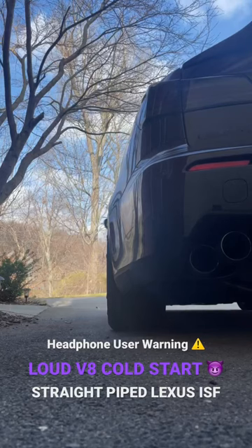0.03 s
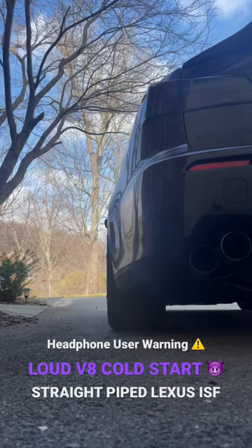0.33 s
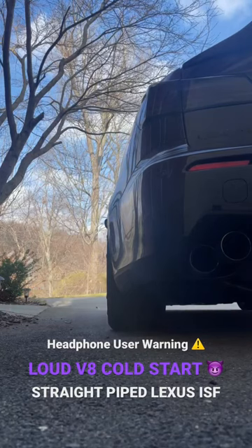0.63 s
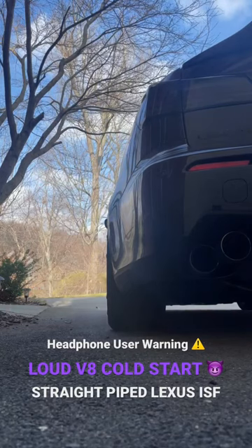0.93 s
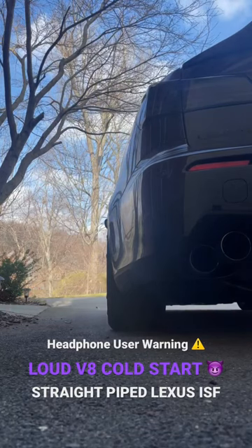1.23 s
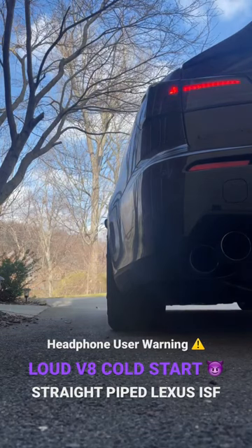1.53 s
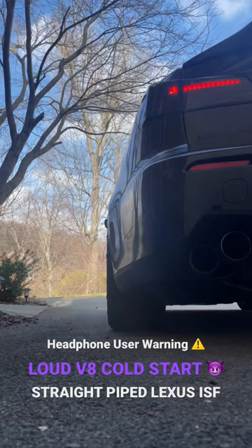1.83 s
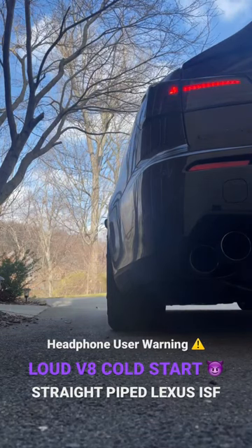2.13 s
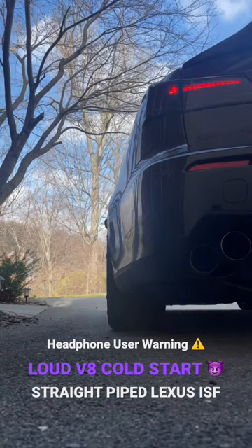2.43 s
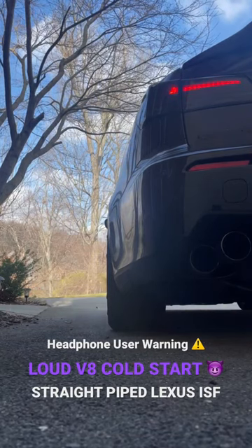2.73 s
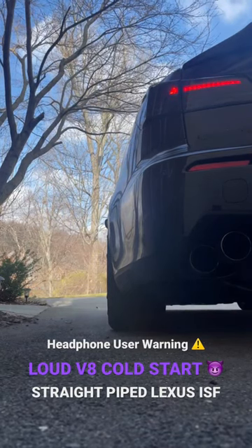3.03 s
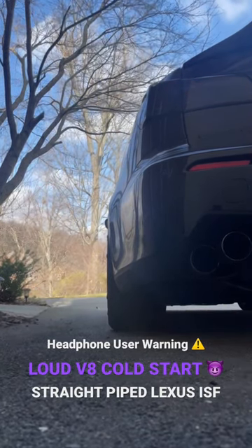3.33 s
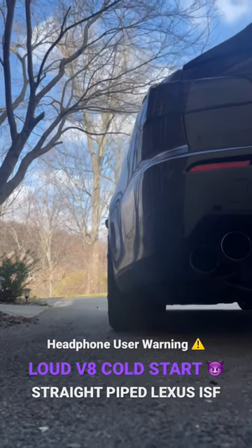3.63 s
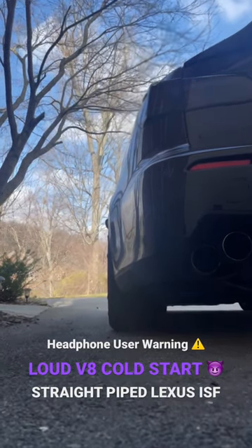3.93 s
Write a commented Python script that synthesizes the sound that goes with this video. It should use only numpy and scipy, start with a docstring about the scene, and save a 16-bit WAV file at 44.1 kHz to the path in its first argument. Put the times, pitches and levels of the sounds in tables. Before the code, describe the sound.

A V8 car engine starts cold outdoors, heard close behind the exhaust. A brief rushing thump opens over quiet low rumble, with a faint bird chirp at 0.5 seconds and a faint pump whirr from 1.7. At 2.3 seconds the starter clacks in and grinds with low puffs. Around 2.9 the engine catches with several bangs, settling into a loud, lumpy, raspy fast idle through 4 seconds.

```python
"""A driveway, close behind the open pipes of a V8 started from cold.
Outdoor rumble, a brief rushing thump, a bird, a faint pump-like whirr. The starter pinion clacks in and
its gears grind, sagging at each compression, while the pipes puff. The engine catches with a few bangs,
sags, and settles into a loud, lumpy fast idle: each firing rings the pipes and lets out a rasp of gas."""
import sys
import numpy as np
from scipy import signal
from scipy.fft import rfft, irfft
from scipy.io import wavfile
from scipy.ndimage import uniform_filter1d, map_coordinates

SR = 44100
rng = np.random.default_rng(int(sys.argv[2]) if len(sys.argv) > 2 else 0)


def log_audio(samples):
    """Write samples as a 16-bit WAV file to the path given in sys.argv[1]."""
    # one column per channel
    frames = np.atleast_2d(samples).T
    # limit to full scale, then quantise
    limited = np.clip(frames, -1, 1)
    pcm = np.round(limited * 32767).astype(np.int16)
    wavfile.write(sys.argv[1], SR, pcm)


N = 176400


def amp(db):
    return 10 ** (np.asarray(db) / 20)


def clock():
    return np.arange(N) / SR


def curve(table, column=1):
    """Table column, linear in time."""
    rows = np.array(table)
    return np.interp(clock(), rows[:, 0], rows[:, column])


def unit_rms(x):
    return x / np.sqrt(np.mean(x ** 2))


def conv(x, response):
    return signal.fftconvolve(x, response)[:N]


def colour(x, points, size=8192):
    """Minimum-phase filter through (f/Hz, gain/dB) points; 12 dB/octave roll-off below them."""
    hz, db = np.array(points, float).T
    f = np.maximum(np.fft.rfftfreq(size, 1 / SR), 1)
    bass_cut = np.minimum(f / hz.min(), 1) ** 2
    gain = amp(np.interp(np.log(f), np.log(np.sort(hz)), db)) * bass_cut
    cepstrum = irfft(np.log(gain))
    cepstrum[1:size // 2] *= 2
    cepstrum[size // 2 + 1:] = 0
    return conv(x, irfft(np.exp(rfft(cepstrum))))


def noise():
    return rng.standard_normal(N)


def wander(rate_hz):
    """Smooth random drift, unit RMS."""
    hold = int(SR / rate_hz)
    steps = np.repeat(rng.standard_normal(N // hold + 1), hold)
    return unit_rms(uniform_filter1d(uniform_filter1d(steps, hold), hold)[:N])


def clicks(times_s, sizes, half_width=8):
    """Band-limited impulses."""
    out = np.zeros(N)
    for at, size in zip(np.asarray(times_s) * SR, sizes):
        i = int(at) + np.arange(-half_width, half_width + 1)
        if i[0] >= 0 and i[-1] < N:
            out[i] += size * np.sinc(i - at) * np.hanning(len(i))
    return out


def fade(decay_s):
    return np.exp(-clock()[:SR // 2] / decay_s)


def stereo(mid, side):
    return np.array([mid + side, mid - side])


def echoes(x, decay_s):
    """Dense reflections, one unit-energy tail per channel."""
    tails = [fade(decay_s) * rng.standard_normal(SR // 2) for _ in range(2)]
    return np.array([conv(x, tail / np.linalg.norm(tail)) for tail in tails])


def low_rings(table, rise_s=0.002, overtone_ratio=1.8, overtone_db=-12.5):
    """Soft pushes ring a low resonance and its overtone."""
    out = np.zeros(N)
    for start_s, db, hz, decay_s in table:
        age_s = np.maximum(clock() - start_s, 0)
        phase = 2 * np.pi * hz * age_s
        ring = np.sin(phase) + amp(overtone_db) * np.sin(overtone_ratio * phase)
        out += amp(db) * ring * (1 - np.exp(-age_s / rise_s)) * np.exp(-age_s / decay_s)
    return out


# side re mid: f/Hz, gain/dB
DIFFUSE_SIDE = [(60, -50.5), (350, -12), (620, -2), (10000, 0)]


def diffuse(points):
    """Coloured noise, centred in the bass, wide in the treble."""
    mid = colour(noise(), points)
    side = colour(colour(noise(), points), DIFFUSE_SIDE)
    return stereo(mid, side) / mid.std()


# ground and bodywork reflections: delay/ms
REFLECTION_DELAYS_MS = [8.1, 2.6, 6]
# same reflections, yard tail: f/Hz, gain/dB
REFLECTION_EQ = [(60, -25), (200, -19), (620, -7.5), (1100, -7), (10000, -1.5)]
YARD_EQ = [(100, -22), (400, -6.5), (700, 2.5), (1300, -5), (3000, 2), (10000, -3)]


def outdoors(x, yard_decay_s=0.022):
    """Direct sound, side reflections off ground and car, short tail from the yard."""
    t = clock()
    taps = [(-1) ** k * np.interp(t - ms / 1000, t, x, left=0)
            for k, ms in enumerate(REFLECTION_DELAYS_MS)]
    side = colour(sum(taps), REFLECTION_EQ) / np.sqrt(len(taps))
    return stereo(x, side) + echoes(colour(x, YARD_EQ), yard_decay_s)


# outdoor rumble: f/Hz, gain/dB
AIR_EQ = [(28, -9.5), (81, 0.5), (169, -9.5), (400, -17.5), (651, -22.5), (840, -18.5), (1330, -26.5),
          (2580, -47), (11000, -84)]
# bumps: t/s, level/dB, f/Hz, decay/s
BUMP_RINGS = [(.67, -29, 78.4, 0.061), (.745, -22.5, 104, 0.017), (.77, -27.5, 59.7, 0.048),
              (.862, -27, 84, 0.019), (1.725, -29, 70, 0.024), (2.017, -20, 110, 0.013)]


def background(air_db=-42):
    """Wavering outdoor rumble, a few soft bumps."""
    return diffuse(AIR_EQ) * amp(air_db + wander(15.1)) + low_rings(BUMP_RINGS)


# notes: t/s, length/s, start f/Hz, end f/Hz, level/dB
BIRD_NOTES = [(0.498, 0.14, 2500, 3330, -59.5), (0.506, 0.13, 3400, 4100, -60),
              (0.613, 0.055, 3250, 4210, -53), (0.647, 0.046, 2350, 2890, -54)]


def bird(rasp_depth=.018, husk_db=-8, trees_db=-6, trees_decay_s=.13):
    """Thin, raspy notes swell as they rise; blurred echo from the trees."""
    notes = np.zeros(N)
    for start_s, length_s, from_hz, to_hz, db in BIRD_NOTES:
        progress = np.clip((clock() - start_s) / length_s, 0, 1)
        glide_hz = from_hz + (to_hz - from_hz) * np.sin(np.pi * progress / 2)
        hz = glide_hz * (1 + rasp_depth * wander(700))
        swell = np.sin(np.pi * progress ** 1.5)
        notes += amp(db) * swell * np.sin(2 * np.pi * np.cumsum(hz) / SR)
    blurred = notes * wander(1400)
    return notes + amp(husk_db) * blurred + amp(trees_db) * echoes(blurred, trees_decay_s)


# envelopes: t/s, thump level/dB, rush level/dB
RUSH_LEVELS = [(.032, -80, -80), (.04, -63, -33), (.058, -16, -30.5), (.072, -27.5, -25),
               (.11, -13.5, -32.5), (.15, -21.5, -47), (.175, -31.5, -51.5), (.25, -33, -55.5),
               (.5, -67, -100)]
# thump, rush: f/Hz, gain/dB
THUMP_EQ = [(25, -13), (70, -2), (130, 1), (200, -10.5), (480, -18.5), (800, -35.5), (2000, -83.5)]
RUSH_EQ = [(100, -1.5), (450, 11), (800, -2), (1500, -11), (4000, -14.5), (6500, -23.5), (11000, -41)]


def rush():
    """Brief rush darkening into a low thump."""
    thump = diffuse(THUMP_EQ) * amp(curve(RUSH_LEVELS, 1))
    return thump + diffuse(RUSH_EQ) * amp(curve(RUSH_LEVELS, 2))


# whirr and hiss envelope, switching ticks: t/s, level/dB
PUMP_LEVEL = [(1.64, -120), (1.67, -76), (1.8, -73), (2.1, -68.5), (2.27, -62), (2.35, -120)]
PUMP_TICKS = [(1.68, -66), (1.724, -64), (1.985, -61)]
# hiss and ticks: f/Hz, gain/dB
PUMP_EQ = [(1000, 10), (2000, 7.5), (4000, -1), (5500, -10.5), (10000, -13)]


def pump(whirr_hz=3820, whirr_db=-15, flutter_db=3.5, tick_decay_s=0.026):
    """Pump and valves tick on; faint hiss and rough whirr, like a fuel pump."""
    times_s, db = np.array(PUMP_TICKS).T
    tick_envelope = conv(clicks(times_s, amp(db)), fade(tick_decay_s))
    whirr = amp(whirr_db) * wander(210) * np.sin(2 * np.pi * whirr_hz * clock())
    running = (diffuse(PUMP_EQ) + whirr) * amp(curve(PUMP_LEVEL) + flutter_db * wander(53))
    return running + diffuse(PUMP_EQ) * tick_envelope


# starter envelope: t/s, level/dB
STARTER_LEVEL = [(2.24, -120), (2.275, -31), (2.293, -8.5), (2.324, -6.5), (2.335, 1), (2.55, -4),
                 (2.89, 0), (2.97, -0.5), (3.1, -63)]
# compression peaks: t/s
COMPRESSION_TIMES_S = [2.499, 2.597, 2.684, 2.771, 2.854]
# starter body: f/Hz, gain/dB
STARTER_EQ = [(150, 5), (400, 1), (850, -1.5), (1400, -4.5), (2400, -11.5), (4000, -13.5), (5500, -13.5),
              (7500, -29.5), (10500, -35.5)]
# gear whines at nominal speed: f/Hz, bandwidth/Hz, level/dB
WHINE_BANDS = [(569, 97, -6), (766, 30, -12), (1017, 27, -10.5), (1740, 33, -12), (2135, 27, -13.5),
               (3047, 64, -16.5)]


def starter():
    """Pinion clacks in and grinds; teeth and whines drop in pitch and swell at each compression."""
    starter_db, rattle_db, grit_db = -34, 1.24, 2.5
    mesh_hz, teeth_db, tooth_spread_db = 507.7, -5.5, 3
    speed_sag, speed_waver = 0.07, .015
    strain_width_s, gear_strain_db, grind_strain_db = 0.017, 6, 3
    clack_s, clack_db, clack_decay_s = 2.329, -22, 0.03
    t = clock()
    strain = sum(np.exp(-.5 * ((t - at) / strain_width_s) ** 2) for at in COMPRESSION_TIMES_S)
    travel = np.cumsum(1 - speed_sag * (strain - .5) + speed_waver * wander(25))
    tooth_count = travel * mesh_hz / SR
    times_s = np.interp(np.arange(int(tooth_count[-1])), tooth_count, t)
    impacts = clicks(times_s, amp(tooth_spread_db * noise()[:len(times_s)]))
    teeth = unit_rms(colour(impacts, STARTER_EQ))
    whines = sum(amp(db) * unit_rms(signal.lfilter(*signal.iirpeak(hz, hz / width_hz, fs=SR), noise()))
                 for hz, width_hz, db in WHINE_BANDS)
    whines = map_coordinates(whines, [travel], mode="mirror")  # pitch follows speed
    gears = outdoors(amp(teeth_db) * teeth + whines) * amp(gear_strain_db * strain)
    grind = diffuse(STARTER_EQ) * amp(grind_strain_db * strain + grit_db * wander(500))
    clack = (t > clack_s) * np.exp(-np.abs(t - clack_s) / clack_decay_s) * diffuse(STARTER_EQ)
    envelope = amp(starter_db + curve(STARTER_LEVEL) + rattle_db * wander(90))
    return (gears + grind) * envelope + amp(clack_db) * clack


# puffs: t/s, level/dB, f/Hz, decay/s
PUFF_RINGS = [(2.335, -20.5, 108.3, 0.04), (2.455, -14, 116, 0.016), (2.478, -5.5, 83, 0.014),
              (2.505, -15, 57.2, 0.075), (2.582, -8.5, 58.6, 0.052), (2.757, -9, 83, 0.021),
              (2.82, -15, 65.4, 0.065), (2.904, -2.5, 90.2, 0.046), (2.93, -5.5, 129.2, .05),
              (2.955, -9, 71.7, 0.058), (3.105, -4, 113.3, 0.028)]


def puffs():
    """Low puffs from the pipes while the engine cranks and catches."""
    return outdoors(low_rings(PUFF_RINGS))


def pipe_smear(x, centre_hz=390, q=1.37):
    """All-pass: the pipes delay tones near the centre, turning each blow into a falling bark."""
    _, poles = signal.iirpeak(centre_hz, q, fs=SR)
    return signal.lfilter(poles[::-1], poles, x)


# pipe response to one firing: f/Hz, gain/dB
PIPE_EQ = [(25, -19), (45, -2.5), (65, -2.5), (105, -3.5), (135, -1), (172, 4.5), (205, -9), (248, -5),
           (305, 3), (345, -6.5), (380, 0.5), (430, -5.5), (500, 3.5), (560, -7), (760, -9.5), (830, -15.5),
           (1050, -12), (1270, -30), (2000, -30), (3000, -48.5), (5000, -71), (11000, -73)]


def pipe_ring(pulses, pitch_ratio=1):
    """Pressure pulses ring the open pipes."""
    return colour(pulses, np.array(PIPE_EQ) * [pitch_ratio, 1])


# hard firings: t/s, blow level/dB, crack level/dB
HARD_FIRINGS = [(2.924, 3.5, -6.5), (2.946, 2, -22), (2.964, 8.5, -29), (2.995, -2, -1), (3.099, 2.5, -18),
                (3.12, 5.5, -1), (3.149, 2.5, -9.5), (3.218, -8, -43), (3.307, 2.5, -7.5), (3.353, 1.5, 4),
                (3.425, -9.5, 9.5), (3.47, 3.5, -8.5), (3.526, -2, -20), (3.601, -3, -17),
                (3.694, -9.5, -9), (3.717, -4.5, -12), (3.83, -7, -14)]
# crack: f/Hz, gain/dB
CRACK_EQ = [(400, -1), (1000, 1), (2800, -8.5), (4000, -13.5), (7000, -15.5), (11000, -27)]


def bangs(blow_gain_db=29.5, crack_gain_db=-9, crack_decay_s=0.0023, pitch_spread=0.12):
    """Rich charges go off hard: a sharp crack, and a blow ringing the pipes at a random pitch."""
    times_s, blow_db, crack_db = np.array(HARD_FIRINGS).T
    ratios = np.exp(pitch_spread * rng.standard_normal(len(times_s)))
    blows = sum(pipe_ring(clicks([at], [amp(db)]), ratio)
                for at, db, ratio in zip(times_s, blow_db, ratios))
    crack_envelope = conv(clicks(times_s, amp(crack_db)), fade(crack_decay_s))
    cracks = colour(noise() * crack_envelope, CRACK_EQ)
    return outdoors(pipe_smear(amp(blow_gain_db) * blows + amp(crack_gain_db) * cracks))


# engine speed: t/s, four-stroke cycle rate/Hz
CYCLE_RATE = [(2.9, 6.2), (3.0, 9.0), (3.1, 10.8), (3.17, 14.3), (3.28, 13.4), (3.35, 14.0), (3.42, 13.85),
              (3.55, 13.41), (3.68, 13.12), (3.85, 12.97), (4.0, 12.94)]
# cylinders in firing order: level/dB, lag/ms
FIRING_ORDER = [(-.3, .1), (-3, .8), (-6, -1.0), (-1.7, .6), (-2.4, 1.1), (.8, -.4), (-.8, .7), (-9, .8)]
# combustion: t/s, boom level/dB, bark level/dB, gas level/dB, firing spread/dB
COMBUSTION = [(2.9, -25, -28, -15, 13), (2.93, -9, 4, 0.5, -2), (2.99, 15, 5, 6.5, 8.5),
              (3.04, -1, -0.5, -14, 1.5), (3.09, 4.5, 2.5, -9.5, 1.5), (3.15, 6, 4.5, 3.5, 2),
              (3.19, 3, -9.5, -24.5, 2), (3.295, -1, -9, -28, 2), (3.315, 2, 2.5, -4, 4.5),
              (3.338, 0, -6.5, -4, 0.5), (3.365, 4.5, 0, -2.5, 1.5), (3.5, 4, 1, -5.5, 1.7),
              (3.65, 3, 1, -4, 1.4), (4.0, 1, 1, -5, 0.4)]
# gas rush: f/Hz, gain/dB
GAS_EQ = [(300, -22), (700, 12.5), (1100, 9.5), (1500, 1), (2800, -2.5), (4000, -17.5), (5500, -19),
          (7500, -38.5), (10500, -37.5)]


def engine():
    """Eight uneven firings a cycle ring the pipes, wavering with the flow; gas rasps out after each."""
    pipe_gain_db, crossover_hz = 29, 212
    cylinder_one_s, waver_ms, waver_hz, jitter_ms_per_db = 3.8305, .11, 22, .14
    gas_gain_db, gas_decay_s, gas_spread_db, gust_db, gas_side_db = -14, 0.0061, 3, 1.5, -3
    t = clock()
    boom_db, bark_db, gas_db, spread_db = (curve(COMBUSTION, column) for column in (1, 2, 3, 4))
    cycles = np.cumsum(curve(CYCLE_RATE)) / SR
    firing_count = (cycles - np.interp(cylinder_one_s, t, cycles)) * len(FIRING_ORDER)
    count_at_catch = int(np.interp(COMBUSTION[0][0], t, firing_count))
    firings = np.arange(int(firing_count[-1]), count_at_catch, -1)
    due_s = np.interp(firings, firing_count, t)
    cylinder_db, lag_ms = np.array(FIRING_ORDER)[firings % len(FIRING_ORDER)].T
    time_draw, level_draw, gas_draw = rng.standard_normal((len(firings), 3)).T
    uneven_db = np.interp(due_s, t, spread_db)
    drift_ms = waver_ms * np.interp(due_s, t, wander(waver_hz))
    times_s = due_s + (lag_ms + drift_ms + jitter_ms_per_db * uneven_db * time_draw) / 1000

    pulses = clicks(times_s, amp(cylinder_db + uneven_db * level_draw))
    pipes = amp(pipe_gain_db) * pipe_ring(pulses)
    boom = signal.sosfiltfilt(signal.butter(4, crossover_hz, fs=SR, output="sos"), pipes)
    bark = pipes - boom
    gas_pulses = clicks(times_s, amp(cylinder_db + gas_spread_db * gas_draw))
    flow = conv(gas_pulses, fade(gas_decay_s)) * amp(gas_gain_db + gas_db + gust_db * wander(30))
    gas_mid, gas_side = (colour(noise() * flow, GAS_EQ) for _ in range(2))
    direct = boom * amp(boom_db) + bark * amp(bark_db) + gas_mid
    return outdoors(pipe_smear(direct)) + stereo(0, amp(gas_side_db) * gas_side)


def scene():
    return engine() + bangs() + puffs() + starter() + pump() + rush() + bird() + background()


def record(dry, ceiling=1.1, cutoff_hz=11300):
    """Microphone rounds the loudest peaks; steep low-pass."""
    lowpass = signal.ellip(10, .2, 80, cutoff_hz, fs=SR, output="sos")
    return signal.sosfilt(lowpass, ceiling * np.tanh(dry / ceiling))


dry = scene()
out = record(dry)
log_audio(out)
```